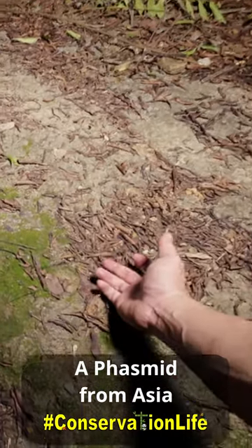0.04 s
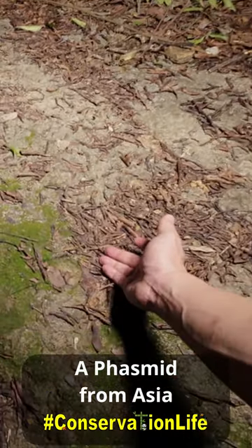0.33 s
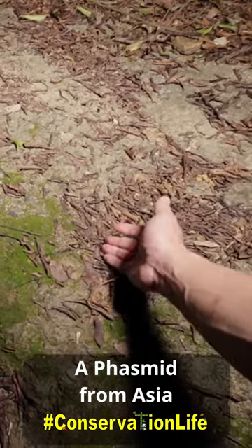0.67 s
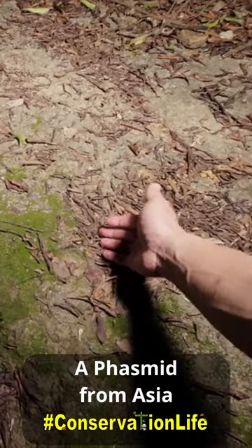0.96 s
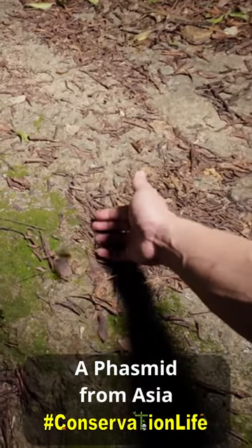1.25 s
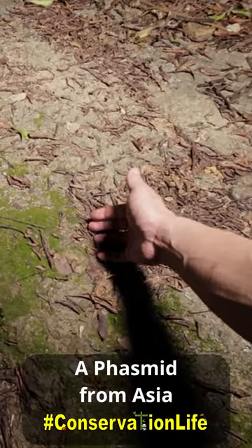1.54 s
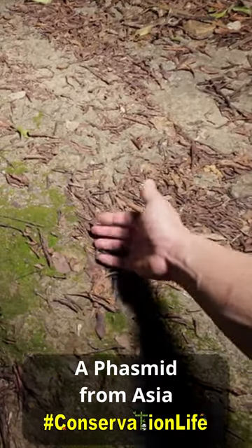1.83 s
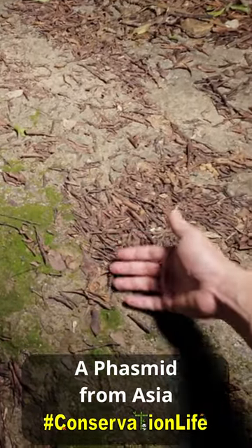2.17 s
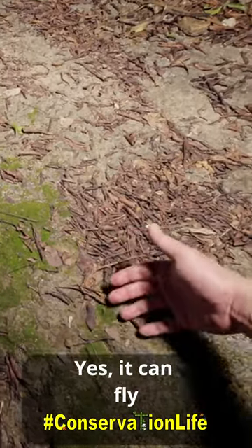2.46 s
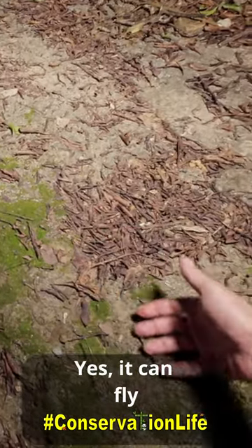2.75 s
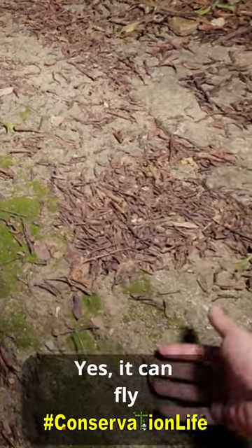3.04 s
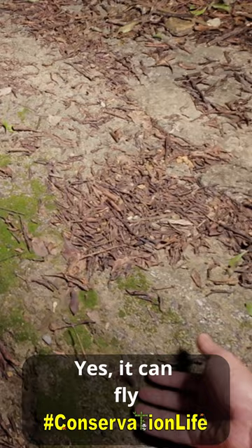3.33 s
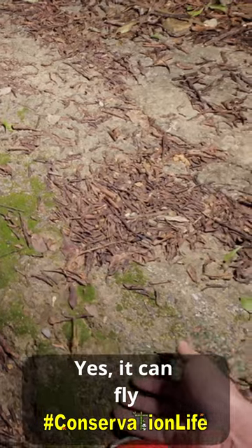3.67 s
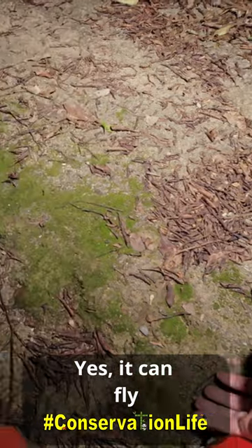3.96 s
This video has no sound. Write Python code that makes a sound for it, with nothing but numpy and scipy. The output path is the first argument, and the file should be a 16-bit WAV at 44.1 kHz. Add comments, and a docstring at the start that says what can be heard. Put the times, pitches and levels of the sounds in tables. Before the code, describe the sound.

Forest insects drone at a high pitch while nearer crickets trill and rasp on and off. Dry leaf litter crackles underfoot, then rustles briefly, with a few knocks and a low air rumble on the hand-held microphone.

```python
"""Insects along a forest path.

By day, on a hand-held microphone: a far chorus of cicadas and crickets drones near 5.5 kHz while nearer
crickets trill with their wings and two katydids rasp in and out of step. Close by, dry leaf litter
crackles, twigs snap and there is one long rustle as someone shifts their weight. The microphone picks up
a few finger knocks, soft bumps of the hand and a low rumble of air."""
import sys
import numpy as np
from scipy import signal
from scipy.fft import rfft, irfft
from scipy.io import wavfile
from scipy.ndimage import uniform_filter1d

SR = 44100
rng = np.random.default_rng(int(sys.argv[2]) if len(sys.argv) > 2 else 0)


def unload_wav(signal):
    """Save mono or channel-first audio to the path in sys.argv[1] as 16-bit WAV at rate SR, clipped to [-1, 1]."""
    wavfile.write(
        sys.argv[1],
        SR,
        np.round(np.clip(np.atleast_2d(signal).T, -1, 1) * 32767).astype(np.int16),
    )


N = 176400

# spectrum of dry leaves breaking close by (frequency [Hz], relative level [dB])
DRY_LEAF_SPECTRUM = [(300, -20), (1000, 2), (1650, 8.5), (2300, 7), (3700, 6), (5000, -2), (7000, 1),
                     (10000, 4.5), (12000, 1.5), (15500, -3)]


def chorus():
    """Countless insects far off in the forest merge into steady bands."""
    # the main drone (frequency [Hz], relative level [dB])
    spectrum = [(4600, -40), (4850, -23), (5150, -8.5), (5400, -3.5), (5650, 0), (5800, -7), (6020, -15),
                (6170, -33), (7000, -50)]
    # more distant choirs (centre [Hz], width [Hz], level [dB])
    choirs = [(1680, 440, -67), (1963, 140, -64), (2630, 55, -65.5), (3024, 395, -58.5), (4550, 110, -69),
              (7780, 400, -65), (8520, 260, -71)]
    drone = colour(rng.standard_normal(N), spectrum) * undb(-46 + 0.31 * wander(5.56))
    return drone + sum(band(hz, width) * undb(db + 1.6 * wander(6.58)) for hz, width, db in choirs)


def wing_strokes(hz, pulse_hz, duty, sag_hz, jitter, waver_hz):
    """Each stroke of a cricket's wing sounds one tone pulse that sags in pitch."""
    cycle = np.cumsum(pulse_hz * (1 + jitter * wander(20))) / SR % 1
    stroke = np.minimum(cycle / duty, 1)  # runs from 0 to 1, then rests
    pitch = hz + sag_hz * (.5 - stroke) * (stroke < 1) + waver_hz * wander(90)
    envelope = np.sin(np.pi * stroke) * undb(1.9 * wander(30.42))
    return unit(envelope * tone(pitch))


def cricket_trills():
    """Fast trains of wing strokes: the nearest cricket trills twice and a faint one joins late."""
    # the course of each trill (time [s], pitch [Hz], level [dB])
    first = [(0, 5615, -50.5), (.35, 5637, -47.5), (.7, 5625, -47), (.9, 5605, -51.5), (1.15, 5595, -62)]
    second = [(2.3, 5490, -62), (2.55, 5550, -47), (2.85, 5600, -46), (3.2, 5650, -46.5),
              (3.5, 5665, -45.5), (4, 5655, -45.5)]
    late = [(2.7, 5024, -67), (3.3, 5030, -58), (4, 4970, -54)]
    out = 0
    for rows, pulse_hz, wet in ((first, 41.6, 0.63), (second, 44.57, 0.13), (late, 32.45, 0.7)):
        song = wing_strokes(curve(rows), pulse_hz, duty=0.6, sag_hz=109, jitter=0.012, waver_hz=14)
        out += unit(forest(song, wet)) * undb(curve(rows, column=2))
    return out


def lower_crickets():
    """Three more crickets: one sings in phrases, one pips nearby, a tree cricket chirps far off."""
    # the phrases and the pips (start [s], length [s], level [dB])
    low_phrases = [(1.985, 0.083, -50.5), (2.1, 0.093, -58), (2.34, .18, -57), (2.69, .13, -54.5),
                   (2.88, 0.427, -54), (3.39, 0.49, -53.5), (3.86, .16, -61)]
    short_pips = [(3.265, 0.034, -50), (3.325, 0.031, -48.5), (3.518, 0.039, -52), (3.74, 0.024, -48),
                  (3.792, 0.031, -48.5)]
    low = wing_strokes(4155, pulse_hz=27, duty=0.79, sag_hz=130, jitter=0.085, waver_hz=23.4)
    low *= phrases(low_phrases, edge_s=0.011)
    pips = np.sqrt(2) * tone(4635 + 18 * wander(90)) * phrases(short_pips, edge_s=0.014)
    tree = wing_strokes(2502, pulse_hz=6.8, duty=0.99, sag_hz=35.3, jitter=0.12, waver_hz=19)
    return forest(low, wet=0.65) + forest(pips, wet=0.15) + unit(forest(tree, wet=0.32)) * undb(-59.5)


def katydids():
    """Two rasping singers drift in and out of step; each wing rings at its own pitch."""
    # rasps of each singer (start [s], length [s], level [dB])
    lower_rasps = [(0.118, 0.23, -60), (.75, 0.32, -60.5), (1.12, 0.25, -58.5), (1.48, 0.26, -58),
                   (1.938, 0.23, -56), (2.57, .26, -59), (3.37, 0.28, -57.5), (3.802, .27, -55.5)]
    upper_rasps = [(0.043, 0.2, -59), (.45, 0.24, -60), (.8, 0.21, -59), (1.186, 0.17, -57),
                   (1.548, 0.26, -59.5), (1.924, 0.27, -58.5), (2.282, 0.21, -57.5), (2.66, 0.23, -59.5),
                   (3.48, 0.2, -58), (3.86, .22, -58.5)]
    tooth_hz, wing_split_hz = 70, 184
    teeth = 1 + 0.18 * tone(tooth_hz * (1 + 0.145 * wander(20)))
    out = 0
    for hz, rasps in ((7955, lower_rasps), (8460, upper_rasps)):
        wings = sum(band(hz + side * wing_split_hz / 2, width_hz=39) for side in (-1, 1))
        rasp = unit(band(hz, width_hz=350) + undb(-5) * wings)
        out += rasp * phrases(rasps, edge_s=0.076)
    return teeth * out


def cicada():
    """One distant cicada: a buzz that swells three times."""
    # the swells (start [s], length [s], level [dB])
    buzzes = [(.44, 0.34, -55), (1.36, 0.34, -52.5), (2.62, 0.44, -59.5)]
    return band(3300, width_hz=360) * phrases(buzzes, edge_s=0.11)


def fractures(spectrum, per_s, spread_db):
    """Tiny fractures underfoot, each a brief burst of noise: most are weak, a few strong."""
    size = undb(spread_db * np.minimum(rng.exponential(size=N), 4))
    clicks = (rng.random(N) < per_s / SR) * size
    decay_s = 0.0004
    energy = signal.lfilter([1], [1, -np.exp(-1 / (decay_s * SR))], clicks ** 2)
    return colour(rng.standard_normal(N) * np.sqrt(energy), spectrum)


def leaf_litter():
    """Dry leaves on the path crackle, crunch briefly and give one long rustle."""
    # stirring of the litter, and the long rustle (time [s], level [dB])
    stir_level = [(0, -82), (.42, -72), (.8, -51.5), (.93, -70), (1.05, -54), (1.12, -67), (1.28, -52),
                  (1.45, -62), (1.58, -56), (1.73, -60.5), (1.93, -51), (2.0, -71), (2.13, -51.5),
                  (2.29, -71), (2.37, -59), (2.5, -53.5), (2.72, -61), (2.85, -55.5), (3.3, -55),
                  (3.45, -66.5), (3.74, -59.5), (3.9, -62), (4, -52)]
    rustle_level = [(2.91, -58), (2.945, -48), (3.0, -54), (3.04, -39.5), (3.075, -43), (3.12, -40.5),
                    (3.16, -37.5), (3.23, -40), (3.27, -48.5), (3.31, -49), (3.38, -76)]
    # brief crunches (start [s], length [s], level [dB])
    crunches = [(2.342, 0.026, -46.5), (2.418, 0.021, -45.5), (2.585, .03, -50), (2.635, 0.045, -49),
                (3.01, 0.028, -45)]
    # rustling leaves (frequency [Hz], relative level [dB])
    rustle_spectrum = [(200, -27), (450, -10.5), (900, -13), (2200, -4.5), (4000, -3), (6000, -1),
                       (9000, -7), (12000, -13), (15500, -24)]
    crackle = fractures(DRY_LEAF_SPECTRUM, per_s=1100, spread_db=5)
    crackle *= undb(curve(stir_level) + 2 * wander(39.88))
    crunch = fractures(DRY_LEAF_SPECTRUM, per_s=3200, spread_db=2.5) * phrases(crunches, edge_s=0.013)
    rustle = fractures(rustle_spectrum, per_s=3200, spread_db=2.5)
    rustle *= undb(curve(rustle_level) + 2 * wander(160))
    return crackle + crunch + rustle


def soil():
    """The soil scuffs dully and grinds under a shifting weight."""
    # scuffing and grinding soil (frequency [Hz], relative level [dB])
    scuff_spectrum = [(200, -18), (500, 1.5), (1000, 3.5), (1600, 2), (2500, -5), (5000, -50)]
    grind_spectrum = [(100, -7), (250, -3), (480, 2), (750, -4), (1100, -10), (2000, -36), (5000, -42)]
    # single scuffs (start [s], length [s], level [dB])
    scuffs = [(1.922, 0.025, -48.5), (2.135, 0.031, -52.5), (2.335, .1, -57), (2.93, 0.03, -48.5),
              (3.29, 0.025, -51), (3.41, 0.028, -51.5), (3.595, 0.034, -53), (3.76, .12, -52.5)]
    # the grinding as the weight shifts (time [s], level [dB])
    grind_level = [(1.05, -73), (1.2, -56), (1.3, -68), (2.65, -66.5), (2.92, -56.5), (3.15, -57),
                   (3.38, -54), (3.55, -59.5), (3.82, -68), (4, -56)]
    scuff = fractures(scuff_spectrum, per_s=1200, spread_db=3) * phrases(scuffs, edge_s=0.0032)
    grind = fractures(grind_spectrum, per_s=700, spread_db=5) * undb(curve(grind_level))
    return scuff + grind


def twigs():
    """Twigs and leaf stalks snap close by, each a sharp burst of noise."""
    # the snaps (time [s], relative level [dB])
    snaps = [(0.4755, -38), (0.625, -36), (.747, -34), (.772, -33), (1.067, -34.5), (1.246, -37),
             (1.3136, -32), (1.4308, -33), (1.535, -34.5), (1.5545, -27.5), (1.59, -36), (1.632, -37),
             (1.6705, -39), (1.694, -29.5), (1.776, -39), (2.0793, -23.5), (2.098, -32), (2.124, -30),
             (2.6455, -30), (2.6535, -31), (3.049, -28), (3.09, -26), (3.144, -23), (3.1954, -28),
             (3.235, -27), (3.7073, -35), (3.73, -33)]
    # a breaking twig (frequency [Hz], relative level [dB])
    spectrum = [(400, -14), (1500, -3), (3000, -2), (7000, 1), (11000, 0), (15500, -6)]
    decay_s, envelope = 0.00097, 0
    for at, db in snaps:
        age = clock() - at
        envelope += undb(db - 3.5) * (age >= 0) * np.exp(-np.minimum(abs(age) / decay_s, 20))
    return envelope * colour(rng.standard_normal(N), spectrum)


def handling():
    """Fingers knock the microphone body and set it ringing; the hand bumps it softly."""
    # ticks and duller blows (time [s], relative level [dB], centre of the blow's spectrum [Hz])
    knocks = [(.006, -23, 1860), (.0085, -27, 520), (0.476, -33, 3060), (.996, -38, 1550),
              (1.0284, -31, 2310), (1.0284, -25, 260), (1.0304, -18.5, 770), (1.4312, -31.5, 1700)]
    # modes of the microphone body (frequency [Hz], time to fall 60 dB [s], relative level [dB])
    modes = [(204, 0.02, 0.5), (603, 0.014, -4.5), (894, 0.019, -9), (1598, 0.01, 3.5), (2610, 0.0047, 2),
             (4000, 0.0087, 0.5)]
    # bumps of the hand (time [s], peak level [dB], pitch [Hz], half-width [s])
    bumps = [(.73, -35, 65.7, 0.051), (1.037, -26.5, 49.4, 0.026), (1.966, -28.5, 47.6, 0.045),
             (2.103, -31.5, 57.4, 0.018), (2.879, -32, 47, 0.048), (3.97, -37.5, 169.5, 0.024)]
    t, out = clock(), np.zeros(N)
    age = np.arange(SR // 10) / SR
    blow_width_oct = 0.42
    for at, db, centre_hz in knocks:
        ring = 0
        for hz, t60, mode_db in modes:
            drive = 1 / np.hypot(1, (np.log2(hz / centre_hz) / blow_width_oct) ** 2)
            ring += drive * undb(db + mode_db - 60 * age / t60) * np.sin(2 * np.pi * hz * age)
        out += np.interp(t - at, age, ring, left=0, right=0)
    for at, db, hz, half_width in bumps:
        out += undb(db) * np.exp(-((t - at) / half_width) ** 2) * np.cos(2 * np.pi * hz * (t - at))
    return out


def air():
    """Faint forest hiss and a low rumble of air on the microphone."""
    # still air and rumble (frequency [Hz], relative level [dB])
    hiss_spectrum = [(250, -2), (450, -1.5), (800, -2.5), (1150, -2), (1500, -4.5), (2300, -5), (3700, -6),
                     (4800, -14), (6500, -8), (10000, -19), (15500, -20)]
    rumble_spectrum = [(15, -19), (30, -3), (45, 1.5), (66, 0.5), (100, -3.5), (170, -10.5), (250, -16),
                       (400, -28), (800, -51.5)]
    # rise and fall of the rumble (time [s], level [dB])
    rumble_level = [(0, -41.5), (.45, -44.5), (.72, -41), (.95, -42), (1.3, -41.5), (1.75, -41),
                    (2.3, -42.5), (3.3, -41.5), (3.7, -41.5), (4, -39.5)]
    hiss = colour(rng.standard_normal(N), hiss_spectrum) * undb(-59)
    rumble = colour(rng.standard_normal(N), rumble_spectrum) * undb(curve(rumble_level))
    return hiss + rumble


def forest(x, wet):
    """Trunks and leaves scatter the share `wet` of the sound into a short tail."""
    t60_s = 0.46
    age = np.arange(SR // 2) / SR
    tail = rng.standard_normal(len(age)) * undb(-60 * age / t60_s)
    scattered = signal.fftconvolve(x, tail / np.linalg.norm(tail))[:N]
    return np.sqrt(1 - wet) * x + np.sqrt(wet) * scattered


def undb(db):
    return 10 ** (np.asarray(db) / 20)


def unit(x):
    return x / np.sqrt(np.mean(x ** 2) + 1e-20)


def clock():
    return np.arange(N) / SR


def tone(hz):
    """A sine that follows a moving frequency."""
    return np.sin(2 * np.pi * np.cumsum(hz) / SR)


def curve(rows, column=1):
    """One column of a table, joined by straight lines in time."""
    rows = np.array(rows)
    return np.interp(clock(), rows[:, 0], rows[:, column])


def colour(x, spectrum):
    """Shape x by a spectrum of (Hz, dB) points, at rms 1."""
    hz, db = np.array(spectrum).T
    f = np.maximum(np.arange(N // 2 + 1) * SR / N, 1)
    return unit(irfft(rfft(x) * undb(np.interp(np.log(f), np.log(hz), db)), N))


def band(hz, width_hz):
    """Noise around one pitch, like many unrelated voices, at rms 1."""
    f = np.arange(N // 2 + 1) * SR / N
    rolloff = np.sqrt(1 + (2 * (f - hz) / width_hz) ** 6)
    return unit(irfft(rfft(rng.standard_normal(N)) / rolloff, N))


def wander(rate_hz):
    """Smooth random drift at rms 1."""
    hold = int(SR / rate_hz)
    steps = np.repeat(rng.standard_normal(N // hold + 1), hold)
    return unit(uniform_filter1d(uniform_filter1d(steps, hold), hold)[:N])


def phrases(rows, edge_s):
    """An envelope that fades in and out for each (start, length, level) row."""
    envelope = 0
    for start, length, db in rows:
        age = clock() - start
        ramp = np.clip(np.minimum(age, length - age) / edge_s, 0, 1)
        envelope += undb(db) * np.sin(np.pi / 2 * ramp)
    return envelope


def scene():
    """Insects all around, the path underfoot and the microphone in the hand, in mono."""
    insects = chorus() + cricket_trills() + lower_crickets() + katydids() + cicada()
    return (insects + leaf_litter() + soil() + twigs() + handling() + air())[None]


def record(dry):
    """The recorder cuts the top above 15.85 kHz."""
    return signal.sosfilt(signal.ellip(10, .2, 80, 15850, fs=SR, output="sos"), dry)


dry = scene()
out = record(dry)
unload_wav(out)
```